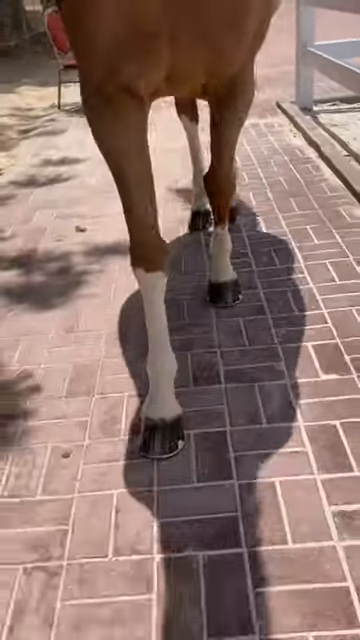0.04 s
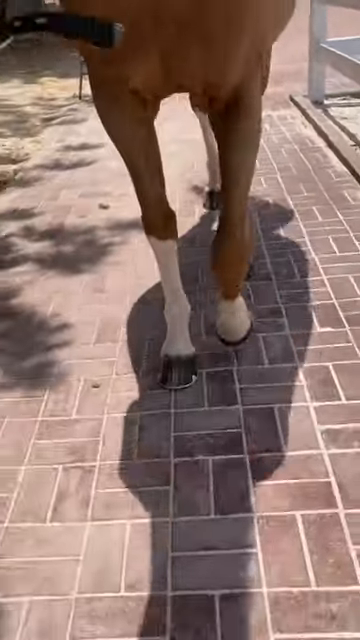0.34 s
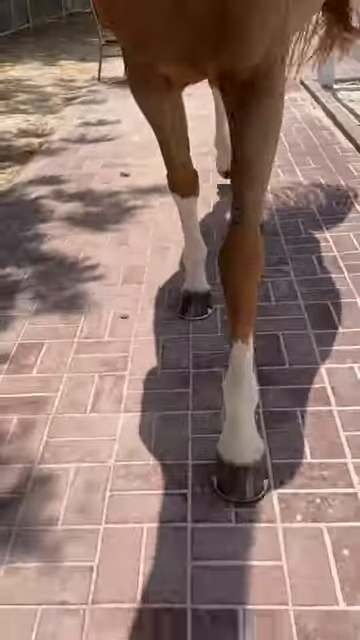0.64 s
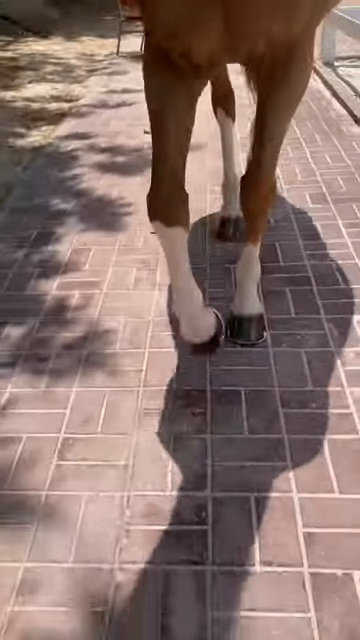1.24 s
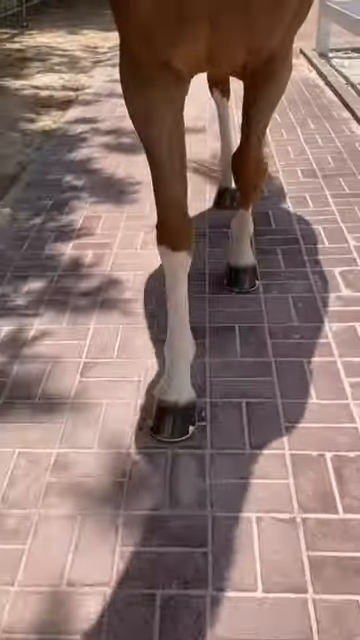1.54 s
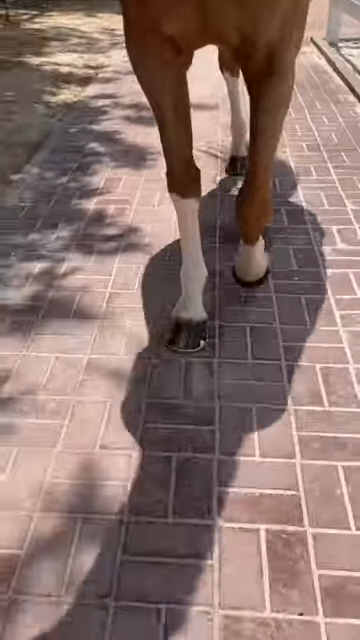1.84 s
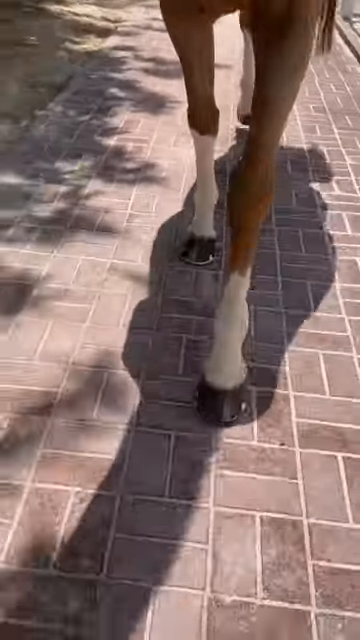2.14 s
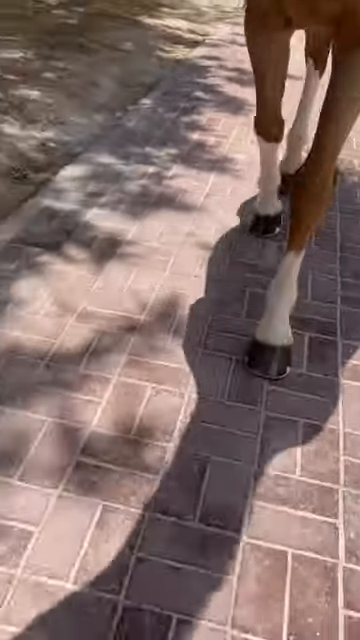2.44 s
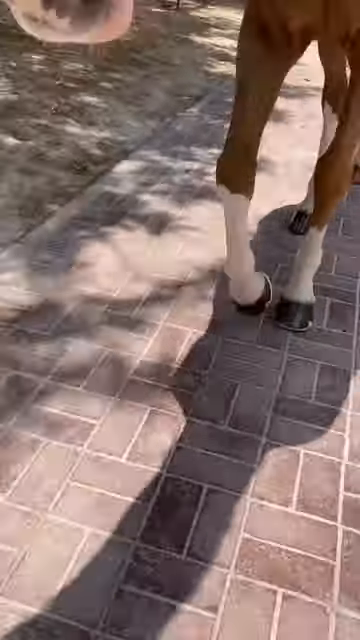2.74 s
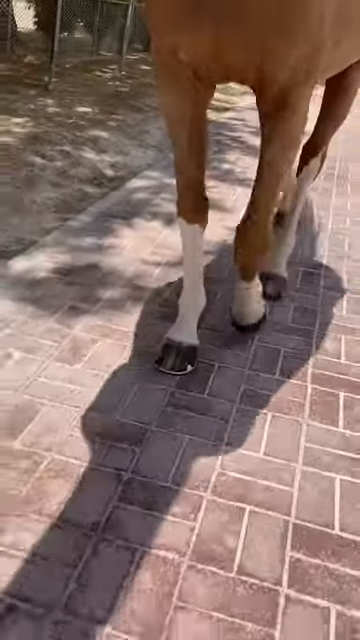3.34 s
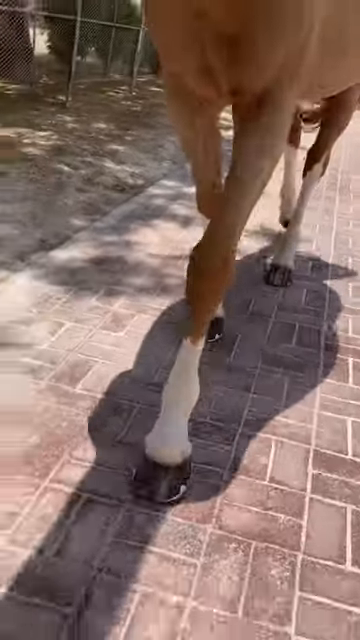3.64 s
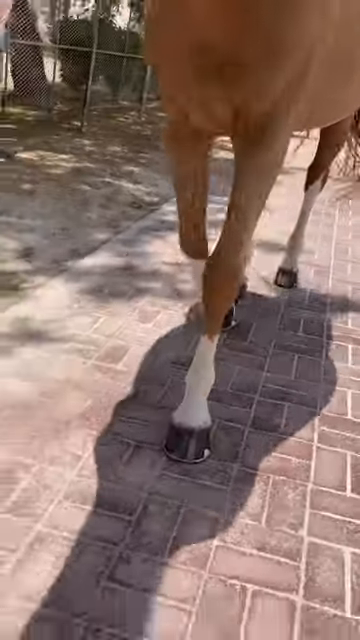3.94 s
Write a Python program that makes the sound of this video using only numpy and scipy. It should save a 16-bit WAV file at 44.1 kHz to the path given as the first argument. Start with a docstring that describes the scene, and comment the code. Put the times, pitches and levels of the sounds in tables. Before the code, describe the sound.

Close, steady clip-clop of a horse's steel shoes on brick, with gritty scuffs and light wind.

```python
"""A shod horse walks on brick paving, close to a pair of microphones.
At each step the steel shoe scuffs and clicks, then the hollow hoof claps down and knocks the brick.
Dull thumps of weight give the steps body, and a yard adds a thin tail.
Behind them sit a low drone, light wind on the microphones, soft hiss and a faint far bird."""
import sys
import numpy as np
from scipy import signal
from scipy.fft import rfft, irfft, next_fast_len
from scipy.io import wavfile
from scipy.ndimage import uniform_filter1d, map_coordinates

SR = 44100
rng = np.random.default_rng(int(sys.argv[2]) if len(sys.argv) > 2 else 0)


def generate_wav(sig):
    """Save sig (samples, or channels by samples) to the path in sys.argv[1] as 16-bit PCM at SR."""
    pcm = np.round(np.clip(np.atleast_2d(sig).T, -1, 1) * 32767).astype(np.int16)
    wavfile.write(sys.argv[1], SR, pcm)


N = 176400
T = np.arange(N) / SR
HIT_T = np.arange(SR // 4) / SR

# colour of the hiss bed (frequency [Hz], level [dB])
AIR_EQ = [(200, 11.5), (700, 9.5), (1500, -1.5), (3000, -6), (5000, -9), (8300, -11.5), (11000, -14),
          (16000, -13.5)]
# bird whistles, mostly falling (time [s], length [s], start pitch [Hz], end pitch [Hz], level [dB])
BIRD_CALLS = [(0.122, 0.14, 4480, 3130, -55), (0.794, 0.094, 4620, 3580, -57),
              (.95, 0.078, 3220, 3050, -66), (1.148, 0.094, 3140, 2820, -58.5),
              (1.876, 0.066, 4640, 3940, -52), (2.605, 0.088, 4090, 3140, -47),
              (3.541, 0.07, 4220, 5080, -60.5)]
# fader ride of the drone (time [s], level [dB])
DRONE_RIDE = [(0, -42.5), (.4, -38), (.8, -37), (1.4, -30.5), (2.3, -32), (2.8, -35.5), (3.2, -39),
              (3.55, -36.5), (4, -32.5)]
# gusts on the microphones (time [s], level [dB])
WIND_RIDE = [(0, -38.5), (.2, -42.5), (.35, -33), (.55, -40.5), (.75, -38.5), (1.25, -38.5), (1.65, -33.5),
             (2.05, -40.5), (2.5, -34.5), (2.8, -34.5), (3.1, -33), (3.5, -36.5), (3.8, -27), (4, -34.5)]
# colour of the wind rumble (frequency [Hz], level [dB])
WIND_EQ = [(20, -13.5), (45, 1.5), (70, 4.5), (110, 2.5), (200, -7), (350, -19.5), (600, -23.5),
           (1100, -29.5), (2000, -59)]
# ring-out of the yard (frequency [Hz], t60 [s])
YARD_DECAY = [(150, 0.46), (900, 0.24), (3000, 0.16), (10000, 0.25)]
# lead of the left microphone over the right (frequency [Hz], phase [rad])
LEFT_LEAD = [(700, 2.7), (2200, 2.5), (4400, 2.3), (6800, 4.4), (9500, 7), (16000, 13)]
# thumps of weight and movement (time [s], relative level [dB], pitch [Hz])
BODY_THUMPS = [(0.279, -28, 139), (0.355, -38, 116), (0.449, -27.5, 112), (0.561, -27, 400),
               (.616, -24.5, 322), (.628, -17.5, 367), (0.637, -21.5, 147), (1.357, -32.5, 217),
               (1.419, -21.5, 240), (1.453, -23.5, 277), (1.485, -24, 188), (1.706, -25, 197),
               (2.166, -17.5, 225), (2.181, -16, 103.4), (2.328, -20.5, 226), (2.473, -22.5, 117),
               (2.587, -22, 533), (2.601, -27, 109), (2.756, -27, 101), (2.925, -20.5, 580),
               (3.041, -27, 194), (3.265, -30.5, 167), (3.622, -23, 95), (3.663, -18.5, 176),
               (3.818, -21.5, 310), (3.889, -27, 108), (3.91, -55, 503)]
# hooves brushing off the ground (time [s], level [dB])
HOOF_LIFTS = [(.1, -54.5), (.72, -56.5), (1.15, -62), (1.78, -53), (2.42, -57), (3.76, -57.5)]
# colour of that brush (frequency [Hz], level [dB])
SHUFFLE_EQ = [(600, -4), (2200, -1), (5000, -6.5), (14000, -19)]
# sand ground under the shoe (peak time [s], 60 dB rise [s], 60 dB fall [s], level [dB])
SHOE_SLIDES = [(.272, .03, 0.51, -52.5), (.39, 0.23, 0.78, -58.5), (0.622, 0.024, 0.061, -30.5),
               (1.065, 0.06, 0.13, -38), (1.135, 0.32, 0.37, -48), (1.45, 0.055, 0.27, -48.5),
               (1.82, 0.21, 0.85, -50), (2.163, 0.012, 0.027, -26.5), (1.306, 0.061, 0.097, -51.5),
               (2.42, 0.58, 0.22, -54.5), (2.586, 0.14, 0.32, -41.5), (2.929, 0.014, 0.16, -44),
               (3.04, 0.31, 1, -54), (3.311, 0.017, 0.26, -40), (3.46, 0.13, 0.19, -54),
               (3.66, 0.32, 0.24, -41.5)]
# colour of the grinding sand (frequency [Hz], level [dB])
SAND_EQ = [(400, -11), (1000, 4), (2000, -10.5), (3500, -9), (5500, -12), (8300, -11.5), (10500, -15),
           (13000, -18), (16000, -19)]
# brief rings of steel (time [s], level [dB], pitch [Hz], t60 [s])
STEEL_PINGS = [(.735, -37, 14900, 0.04), (1.063, -23, 8080, 0.009), (2.169, -18, 4400, 0.011),
               (2.995, -26.5, 7600, 0.0068), (3.6543, 0.5, 8210, 0.0023)]
# the steel shoe meets the brick (time [s], level [dB], t60 [s])
SHOE_CLICKS = [(0.2467, -33.5, 0.041), (0.2655, -27, 0.022), (0.613, -29.5, 0.028), (0.6283, -29.5, 0.021),
               (0.732, -41, 0.056), (1.0373, -43, 0.048), (1.063, -22, 0.027), (1.4152, -28.5, 0.03),
               (1.482, -41, 0.028), (1.573, -47.5, 0.019), (1.8095, -30, 0.026), (1.8274, -26, 0.033),
               (2.145, -32, 0.0046), (2.1515, -50, 0.0046), (2.163, -30.5, 0.047), (2.167, -16, 0.023),
               (2.1785, -29, .014), (2.288, -42.5, 0.022), (2.5573, -36, 0.037), (2.584, -26, 0.014),
               (2.589, -21.5, 0.024), (2.924, -31, 0.035), (2.9937, -23.5, 0.012), (3.3022, -24.5, 0.052),
               (3.3208, -24.5, 0.018), (3.6384, -30, 0.056), (3.6542, -10, 0.0083)]
# colour of the click (frequency [Hz], level [dB])
SHOE_EQ = [(500, -77), (1500, 3.5), (2600, 0.5), (4000, 2), (5500, 4.5), (7000, -0.5), (8400, -1.5),
           (10000, -5), (12000, -15), (16000, -24)]
# hard landings and light taps (time [s], ring level [dB], ring pitch [Hz], knock level [dB])
HOOF_HITS = [(0.2665, -16, 775, -27.5), (0.628, -17.5, 923, -25.5), (1.0624, -23, 740, -25),
             (1.4142, -19, 1010, -29.5), (1.447, -17.5, 938, -64), (1.486, -25.5, 923, -60),
             (1.8286, -17.5, 805, -25.5), (1.947, -34, 576, -72), (2.151, -28, 970, -29.5),
             (2.1688, -12.5, 854, -55), (2.5845, -22.5, 860, -40), (2.592, -24, 847, -46),
             (2.9269, -20.5, 735, -28), (2.9964, -18, 923, -31.5), (3.308, -39, 900, -24.5),
             (3.3199, -11.5, 815, -21), (3.441, -44.5, 840, -60), (3.6574, -8.5, 1007, -51),
             (3.739, -34, 960, -47), (3.816, -50, 755, -52)]
# modes of the hoof's hollow (multiple of ring pitch, relative level [dB], t60 [s])
HOOF_MODES = [(.36, -8.5, 0.04), (0.62, -7, 0.03), (0.831, 0, 0.029), (1.008, 4.5, 0.034),
              (1.42, 3, 0.0074)]
# modes of the struck brick (frequency [Hz], relative level [dB], t60 [s])
BRICK_MODES = [(553, -5.5, 0.08), (1144, 3, 0.049), (1360, 5.5, 0.035), (1778, 1.5, 0.037),
               (2356, -0.5, 0.022)]
# colour of the knock's noisy part (frequency [Hz], level [dB])
KNOCK_EQ = [(100, -41), (300, -3), (550, -6), (900, -10.5), (1350, 4), (1950, -11), (2800, -4),
            (4500, -16.5), (9000, -41), (16000, -69)]


def amp(db):
    """Decibels to gain."""
    return 10 ** (np.asarray(db) / 20)


def unit(x):
    """Scale to rms 1."""
    return x / np.sqrt(np.mean(x ** 2) + 1e-20)


def along(points, hz):
    """Read (frequency [Hz], value) points on a log axis."""
    f, v = np.transpose(points)
    return np.interp(np.log(hz + 1), np.log(f + 1), v)


def curve(rows):
    """Join (time [s], value) points, one value per sample."""
    return np.interp(T, *np.transpose(rows))


def wobble(per_s):
    """A smooth random curve with per_s knots a second."""
    return map_coordinates(rng.standard_normal(N // 8), [T * per_s], mode="wrap")


def filtered(x, response):
    """Shape x with a frequency response."""
    size = next_fast_len(N + SR // 2)
    return irfft(rfft(x, size) * response(np.fft.rfftfreq(size, 1 / SR)), size)[..., :N]


def noise(eq):
    """Coloured noise of rms 1."""
    return unit(filtered(rng.standard_normal(N), lambda hz: amp(along(eq, hz))))


def grit(eq, grain_db=3.5):
    """Coloured noise roughened into fine grains."""
    return unit(noise(eq) * amp(grain_db * wobble(per_s=2500)))


def add(track, s, sound):
    """Mix a sound into the track at time s."""
    part = track[int(s * SR):][:len(sound)]
    part += sound[:len(part)]


def decay(rise_s, t60):
    """Envelope of one blow."""
    return (1 - np.exp(-HIT_T / rise_s)) * np.exp(-np.log(1000) * HIT_T / t60)


def glide(hz):
    """A sine that follows a pitch curve."""
    return np.sin(2 * np.pi * np.cumsum(hz) / SR)


def air(level_db=-59, flutter_db=2, smooth_above_hz=7000):
    """A faint bed of hiss with a slight artificial flutter across its bands."""
    hz, _, bands = signal.stft(noise(AIR_EQ), SR, nperseg=512)
    flutter = uniform_filter1d(rng.standard_normal(bands.shape), size=7, axis=0)
    flutter = unit(uniform_filter1d(flutter, size=16, axis=1))
    depth_db = flutter_db / (1 + (hz[:, None] / smooth_above_hz) ** 2)
    hiss = signal.istft(bands * amp(depth_db * flutter), nperseg=512)[1][:N]
    return amp(level_db) * unit(hiss)


def bird(waver_hz=260, echo_s=0.026):
    """Wavering whistles, blurred by distance and by echoes."""
    calls = np.zeros(N)
    for s, length, start_hz, end_hz, db in BIRD_CALLS:
        progress = np.linspace(0, 1, int(length * SR))
        waver = waver_hz * wobble(per_s=130)[:len(progress)]
        hz = start_hz + (end_hz - start_hz) * progress + waver
        add(calls, s, amp(db) * np.sin(np.pi * progress) * glide(hz))
    echo = rng.standard_normal(len(HIT_T)) * np.exp(-HIT_T / echo_s)
    blurred = calls * wobble(per_s=520)
    return signal.fftconvolve(blurred, echo / np.linalg.norm(echo))[:N]


def drone(pitch_hz=63.5, wander_hz=1.32, waver_db=2.67):
    """One low tone, unsteady in pitch and level."""
    hz = pitch_hz + wander_hz * wobble(per_s=6.6)
    return amp(curve(DRONE_RIDE) + waver_db * wobble(per_s=9.28)) * unit(glide(hz))


def wind(lumpy_below_hz=207, lump_db=5):
    """Wind buffets the microphones: a lumpy low end under a smoother rush."""
    rush = noise(WIND_EQ)
    deep = filtered(rush, lambda hz: 1 / (1 + (hz / lumpy_below_hz) ** 2) ** 2)
    lumps = unit(amp(lump_db * wobble(per_s=18)))
    return amp(curve(WIND_RIDE)) * unit(deep * lumps + rush - deep)


def yard(x, tail_db=-19, walls_db=-16.5):
    """The yard answers with weak close reflections and a thin outdoor tail."""
    hz, t, bands = signal.stft(rng.standard_normal(SR // 2), SR, nperseg=256)
    fade = np.exp(-np.log(1000) * t / along(YARD_DECAY, hz)[:, None])
    tail = signal.istft(bands * fade, SR, nperseg=256)[1]
    walls = rng.standard_normal(len(HIT_T)) * decay(rise_s=0.0039, t60=0.094)
    answer = amp(tail_db) * tail / np.linalg.norm(tail)
    add(answer, 0.003, amp(walls_db) * walls / np.linalg.norm(walls))
    return signal.fftconvolve(x, answer)[:N]


def microphones(front, around, gusts, mono_below_hz):
    """The bass is mono and carries the wind; higher up the left channel leads in phase."""
    bass = lambda hz: 1 / (1 + (hz / mono_below_hz) ** 14)
    sides = np.array([[0.5], [-0.5]])
    turn = lambda hz: np.exp(1j * sides * along(LEFT_LEAD, hz) * (1 - bass(hz)))
    return filtered(front, turn) + filtered(around, lambda hz: 1 - bass(hz)) + filtered(gusts, bass)


def thumps(cycles=6.8, sag=0.21, boost_db=10):
    """The horse's weight lands as a few low cycles that sag in pitch."""
    out = np.zeros(N)
    for s, db, hz in BODY_THUMPS:
        t60 = cycles / hz
        pitch = hz * (1 + sag * (2 * np.exp(-4 * HIT_T / t60) - 1))
        add(out, s, amp(db + boost_db) * decay(0.0015, 2 * t60) ** 2 * glide(pitch))
    return out


def shuffles(half_length_s=0.041):
    """Each lifting hoof brushes the sandy paving in a soft swell."""
    level = sum(amp(db) * np.exp(-((T - s) / half_length_s) ** 2 / 2) for s, db in HOOF_LIFTS)
    return level * grit(SHUFFLE_EQ)


def scuffs():
    """Grainy friction swells and dies as the shoe slides on sand."""
    level = sum(amp(db - 60 * np.maximum((s - T) / rise, (T - s) / fall))
                for s, rise, fall, db in SHOE_SLIDES)
    return level * grit(SAND_EQ)


def pings(rise_s=0.00017):
    """Steel rings for an instant when it is struck on an edge."""
    out = np.zeros(N)
    for s, db, hz, t60 in STEEL_PINGS:
        add(out, s, amp(db) * decay(rise_s, t60) * np.sin(2 * np.pi * hz * HIT_T))
    return out


def shoes(crack_db=-12.5):
    """Steel on brick: a sharp crack, then a short gritty crunch."""
    level = np.zeros(N)
    crack = amp(crack_db) * decay(rise_s=0.00017, t60=0.0021)
    for s, db, t60 in SHOE_CLICKS:
        crunch = decay(rise_s=0.00077, t60=t60)
        add(level, s, amp(db) * (crack + crunch))
    return level * grit(SHOE_EQ)


def hooves(attack_s=0.00049, roughness=0.45, brick_scatter=0.055, graze_s=0.044, graze_below_hz=2200):
    """Each landing grazes the paving, then rings the hollow of the hoof and knocks the brick."""
    ring, knock_level, graze_level = np.zeros((3, N))
    swell = amp(-60 * HIT_T / graze_s)[::-1]  # peaks at the hit
    for s, ring_db, hz, knock_db in HOOF_HITS:
        # drifting phase roughens the hollow ring
        drift = rng.standard_normal((len(HOOF_MODES), len(HIT_T))).cumsum(axis=1) * np.sqrt(hz / SR)
        drift = uniform_filter1d(drift, size=int(SR / hz), axis=1)
        for (ratio, db, t60), phase in zip(HOOF_MODES, roughness * drift):
            tone = np.sin(2 * np.pi * hz * ratio * HIT_T + phase)
            add(ring, s, amp(ring_db + db) * decay(attack_s, 2 * t60) ** 2 * tone)
        for brick_hz, db, t60 in BRICK_MODES:
            detune, phase = rng.uniform(-1, 1, 2)  # no two bricks have the same pitch
            tone = np.sin(2 * np.pi * brick_hz * (1 + brick_scatter * detune) * HIT_T + np.pi * phase)
            add(ring, s, amp(knock_db + db) * decay(attack_s, t60) * tone)
        add(knock_level, s, amp(knock_db - 1) * decay(rise_s=0.0025, t60=0.035))
        add(graze_level, s - HIT_T[-1], amp(knock_db - 3) * swell)
    graze = filtered(noise(KNOCK_EQ), lambda hz: 1 / (1 + (hz / graze_below_hz) ** 4))
    return ring + knock_level * noise(KNOCK_EQ) + graze_level * graze


def scene(spread_db=-2.5, switch_s=2.13, crossfade_s=0.019):
    """The horse in front, air and bird all around, rumble underneath."""
    steps = hooves() + shoes() + scuffs() + shuffles()
    front = steps + pings() + yard(steps) + air()
    # each microphone gets its own ambience and reflections
    around = np.array([air() + bird() + amp(spread_db) * yard(steps) for _ in range(2)])
    gusts = wind()
    # the mono bass band reaches higher from switch_s on
    early = microphones(front, around, gusts, mono_below_hz=574)
    late = microphones(front, around, gusts, mono_below_hz=1113)
    blend = np.clip((T - switch_s) / crossfade_s, 0, 1)
    return early * (1 - blend) + late * blend + thumps() + drone()


def record(dry):
    """A hard high cut trims the very top."""
    return filtered(dry, lambda hz: hz < 16100)


dry = scene()
out = record(dry)
generate_wav(out)
```